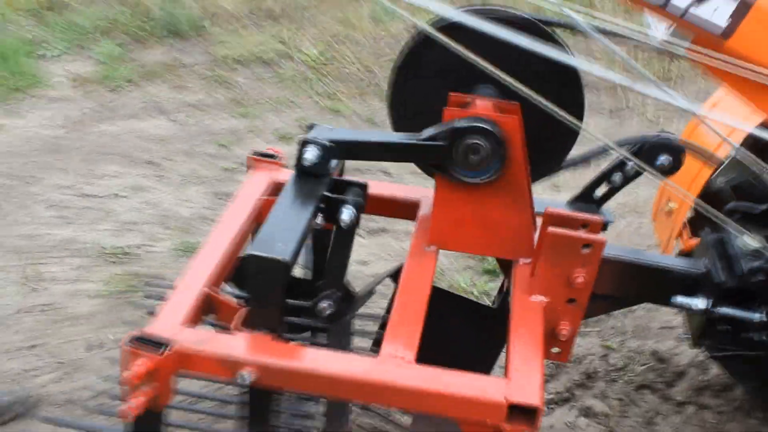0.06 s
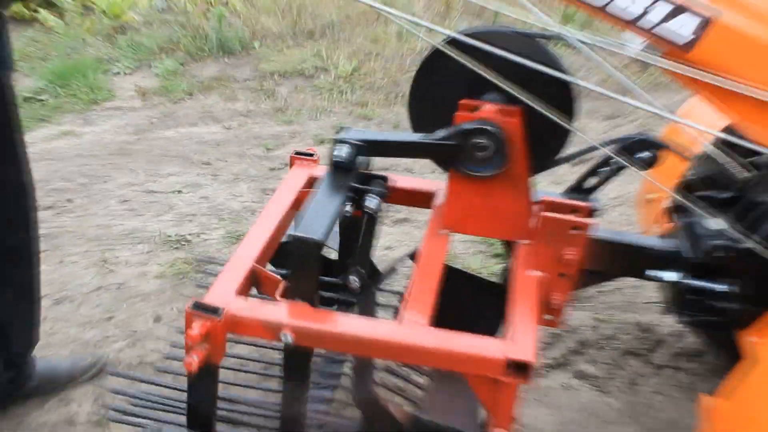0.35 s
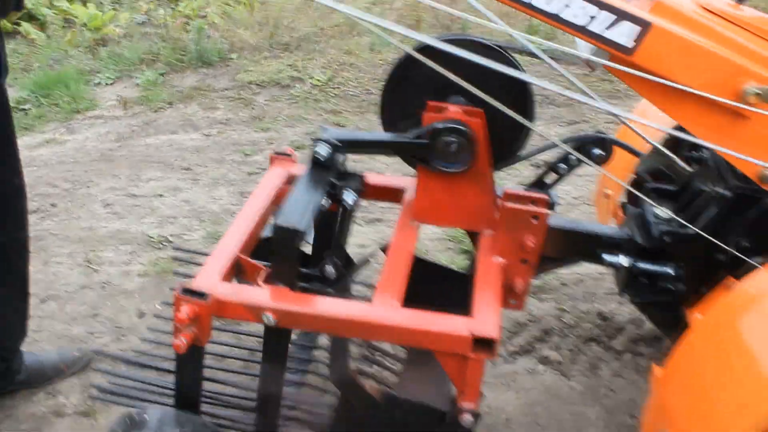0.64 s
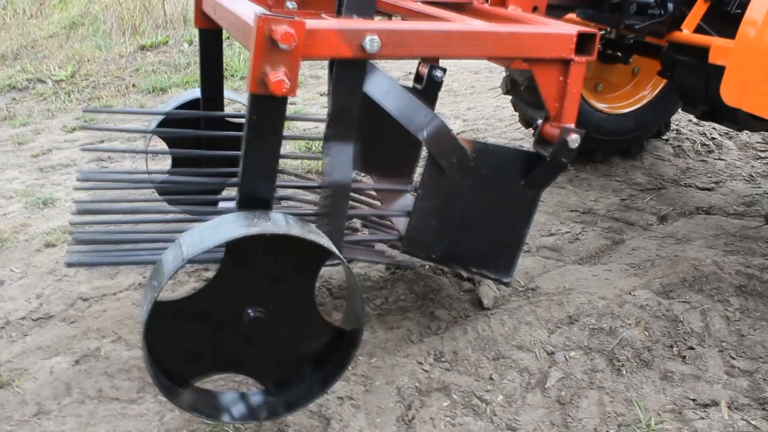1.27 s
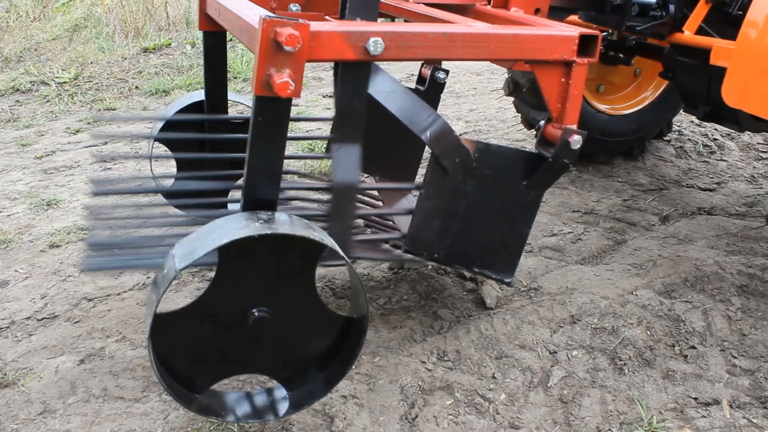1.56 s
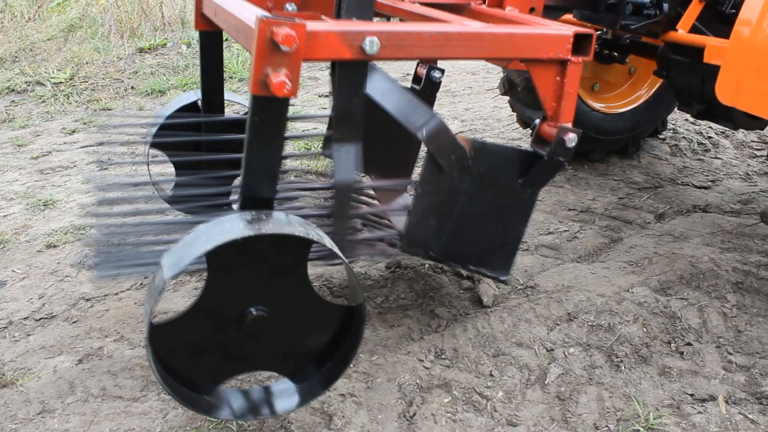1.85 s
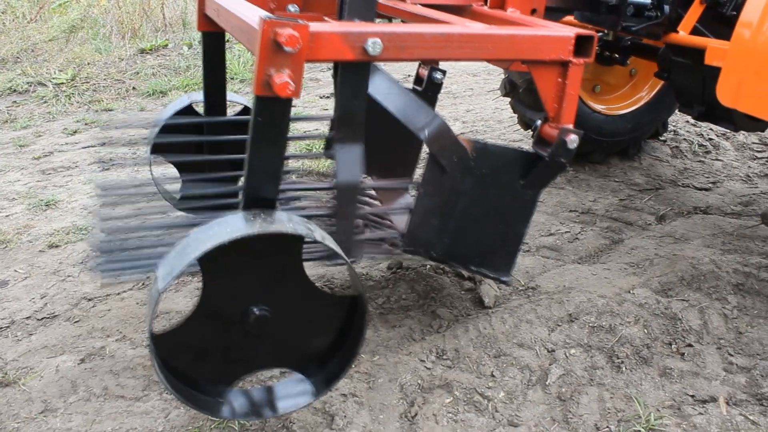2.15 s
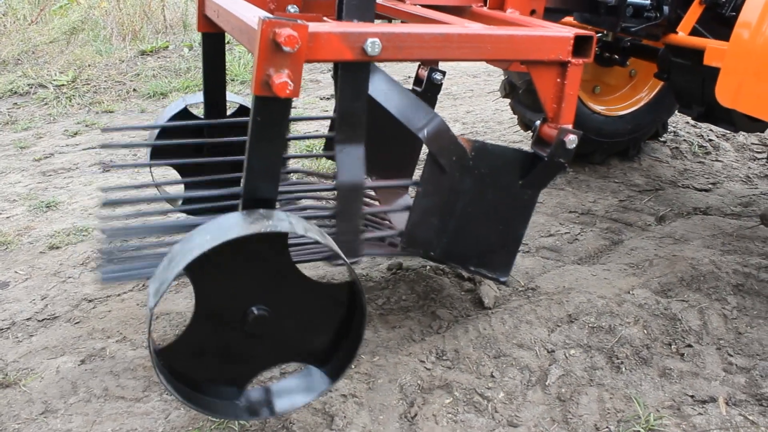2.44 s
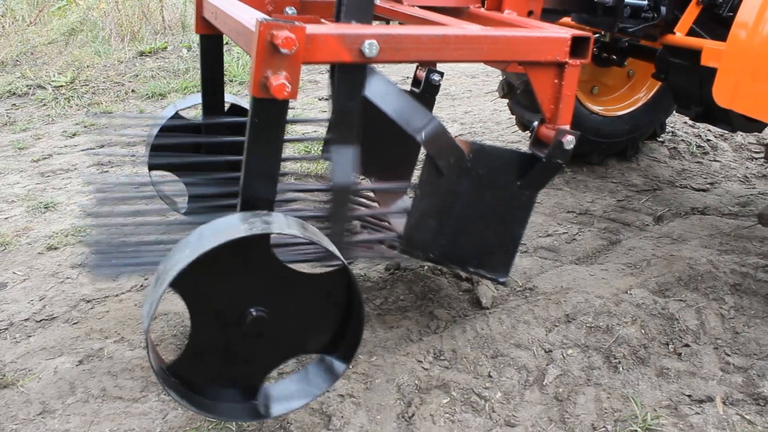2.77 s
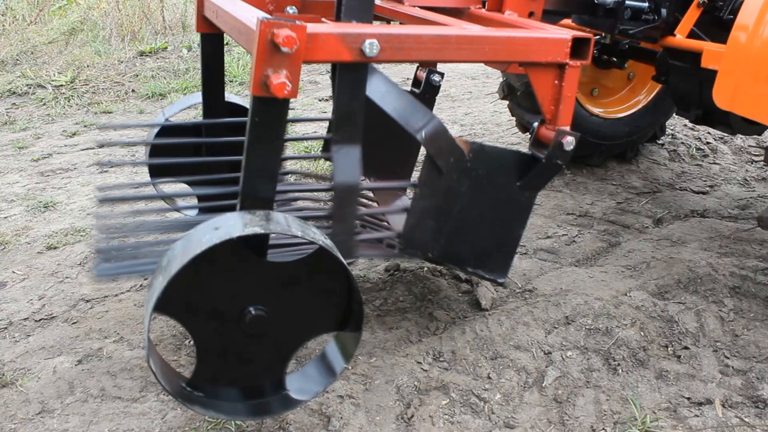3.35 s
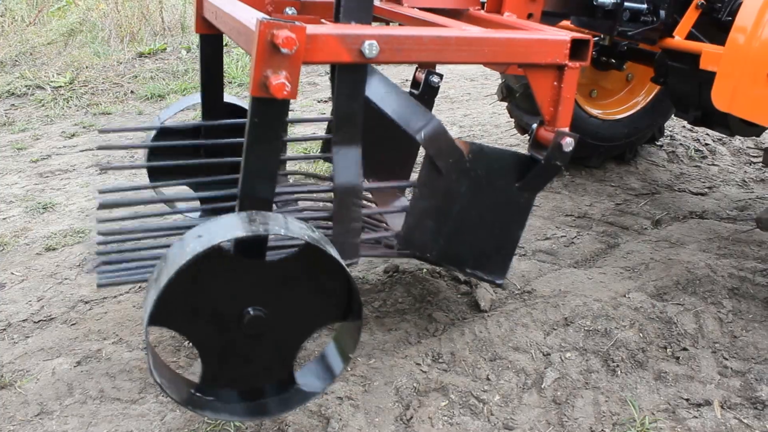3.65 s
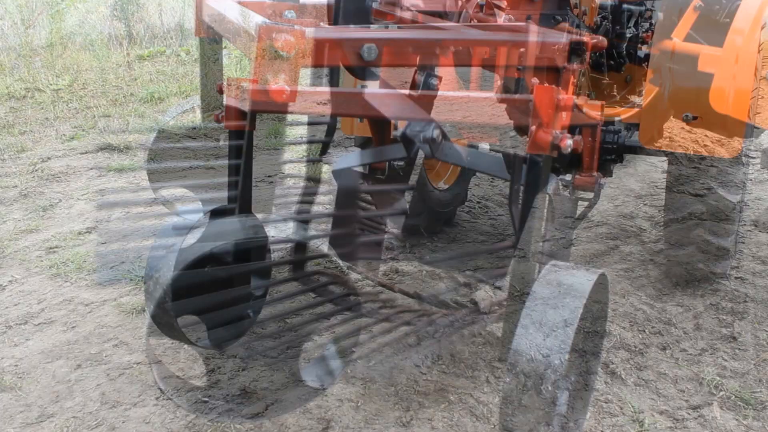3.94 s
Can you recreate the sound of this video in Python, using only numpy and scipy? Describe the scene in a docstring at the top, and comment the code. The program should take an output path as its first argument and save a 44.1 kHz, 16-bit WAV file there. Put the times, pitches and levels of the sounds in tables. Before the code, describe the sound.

A shaking potato digger clatters and pings continuously while the single-cylinder diesel pulling it thumps and knocks. Heard close on open soil with faint wind bumps, the rattle soon turns darker, with a bright jangle on each shake.

```python
"""A single-cylinder diesel walking tractor pulls a potato digger over dry soil, close by.
We start above the frame: each engine cycle gulps, thumps, pops and clatters, the steel sieve shakes
about 6.5 times a second in bursts of rattling, and light wind nudges the microphone.
About a second in we cut to beside the sieve. From there to the end the rattle has a darker top,
and the bright jangle of loose steel at each reversal of the sieve stands out more."""
import sys
import numpy as np
from scipy import signal
from scipy.fft import rfft, irfft, next_fast_len
from scipy.io import wavfile
from scipy.ndimage import uniform_filter1d

SR = 44100
rng = np.random.default_rng(int(sys.argv[2]) if len(sys.argv) > 2 else 0)


def generate_wav(sig):
    """Save sig (samples, or channels by samples) to the path in sys.argv[1] as 16-bit PCM at SR."""
    pcm = np.round(np.clip(np.atleast_2d(sig).T, -1, 1) * 32767).astype(np.int16)
    wavfile.write(sys.argv[1], SR, pcm)


N = 176400
CUT_S, CROSSFADE_S = 0.98, .02  # from above the frame to beside the sieve
CYCLE_S = .10829  # one engine cycle
POP_ABOVE_S, POP_BESIDE_S = .0885, 1.1255  # one pop anchors the engine's beat at each position

# Wind bumps on the microphone: centre_s, level_db, half_width_s
WIND_BUMPS = [(.31, -43, .025), (.43, -52, .025), (.52, -44, 0.018), (.76, -34, .02), (1.86, -50, .014),
              (2.52, -60, .018), (2.85, -47, .02), (3.5, -43, 0.024)]
# Low rumble of the wind: frequency_hz, gain_db
WIND_EQ = [(12, -25), (26, -5), (42, 0), (60, -2), (90, -14), (200, -40), (500, -80)]

# Steady bed of engine and soil noise: frequency_hz, gain_db
BED_EQ = [(25, -58), (55, -37), (85, -11.5), (125, -1), (205, 0.5), (270, -10), (420, -0.5), (750, -9.5),
          (1100, -5.5), (2300, -1), (3200, -13), (6300, -32.5), (9000, -27), (11500, -40)]
# One cycle's gas pulses, above the frame: start_from_pop_s, length_s, start_hz, end_hz, relative_db
PULSES_ABOVE = [(-.0595, .010, 1550, 1000, -16), (-.042, .028, 115, 92, -27), (-.039, .014, 330, 200, -25),
                (-.0072, .014, 400, 280, -16.5), (.021, .014, 320, 190, -25)]
# The same, beside the sieve: start_from_pop_s, length_s, start_hz, end_hz, relative_db
PULSES_BESIDE = [(-.0555, .016, 1600, 1130, -17.5), (-.039, .032, 120, 98, -26),
                 (-.038, .009, 1150, 1050, -20), (-.036, .016, 290, 210, -29), (-.003, .010, 540, 280, -18),
                 (.020, .042, 206, 202, -27)]
# One cycle's piston and valve knocks: start_from_pop_s, relative_db, decay_s
ENGINE_KNOCKS = [(-.053, -27, .008), (-.035, -23, .016), (.012, -28, .01), (.024, -26, .009)]
# Metallic tone of the knocks: frequency_hz, gain_db
KNOCK_EQ = [(50, -39), (120, -26), (300, -26.5), (600, -3), (1100, -3.5), (2200, -5.5), (3000, -5),
            (4500, -22.5), (7000, -22), (11000, -43)]
# How hard the engine fires: time_s, gain_db
ENGINE_LOAD = [(0.06, 1), (0.39, 2), (0.71, -0.5), (0.99, -1), (1.2, 3), (1.42, -0.5), (1.64, 2.5),
               (1.87, -7), (2.08, 6), (2.29, -6.5), (2.41, 5), (2.51, -5), (2.618, 1.5), (2.94, 1),
               (3.05, -0.5), (3.26, -1), (3.8, 4.5), (3.92, -0.5)]

# Clashes as the sieve reverses, one a shake: peak_s, level_db
REVERSALS = [(.08, -40), (.23, -34), (.38, -27), (.533, -27), (.69, -41), (.835, -31), (1.048, -26),
             (1.205, -32), (1.355, -28), (1.507, -25.5), (1.655, -24), (1.815, -30.5), (1.962, -29),
             (2.113, -23.5), (2.27, -27), (2.416, -22), (2.567, -27.5), (2.72, -24), (2.875, -23.5),
             (3.025, -26.5), (3.175, -25), (3.325, -26), (3.475, -30), (3.629, -21), (3.785, -23.5),
             (3.94, -24.5)]
# Bright sheen of the clashes: frequency_hz, gain_db
CLASH_EQ = [(2000, -47), (4200, 11), (5500, -2.5), (6800, 1.5), (7800, 1.5), (9000, -1.5), (10400, 2),
            (11900, -4)]
# Rattle bursts from the sieve and its linkage: peak_s, relative_db, rise_s, fall_s
RATTLE_BURSTS = [(0.019, -20.5, 0.096, 0.091), (0.079, -16, 0.019, 0.064), (0.117, -17, 0.0097, 0.042),
                 (0.229, -19, 0.014, 0.041), (0.274, -15.5, 0.037, 0.043), (0.379, -14, 0.018, 0.041),
                 (0.454, -39, 0.047, 0.1), (0.535, -17, 0.016, 0.098), (0.609, -15.5, 0.088, 0.015),
                 (0.704, -18.5, 0.022, 0.12), (0.778, -26.5, 0.055, 0.043), (0.835, -15, 0.012, 0.041),
                 (0.875, -14.5, 0.016, 0.047), (0.942, -18.5, 0.047, 0.084), (1.05, -19, 0.011, 0.045),
                 (1.079, -18.5, 0.01, 0.066), (1.2, -12, 0.012, 0.042), (1.25, -17.4, 0.01, 0.039),
                 (1.367, -16, 0.043, 0.073), (1.436, -18.5, 0.028, 0.021), (1.529, -15.5, 0.029, 0.056),
                 (1.661, -22.5, 0.035, 0.05), (1.689, -12, 0.03, 0.034), (1.859, -16.5, 0.049, 0.034),
                 (1.962, -20, 0.031, 0.078), (2.011, -21, 0.018, 0.027), (2.127, -15.5, 0.057, 0.027),
                 (2.19, -14, 0.043, 0.018), (2.296, -17.4, 0.036, 0.048), (2.399, -21, 0.0071, 0.12),
                 (2.451, -13.5, 0.05, 0.025), (2.613, -14.0, 0.045, 0.022), (2.724, -16.5, 0.025, 0.033),
                 (2.762, -21, 0.033, 0.062), (2.885, -15.5, 0.041, 0.038), (2.915, -15.5, 0.019, 0.05),
                 (3.024, -16.5, 0.013, 0.076), (3.061, -19, 0.024, 0.031), (3.208, -14.7, 0.036, 0.023),
                 (3.242, -16, 0.021, 0.036), (3.327, -20.0, 0.006, 0.039), (3.364, -15.5, 0.021, 0.043),
                 (3.477, -15.8, 0.015, 0.061), (3.516, -20.5, 0.023, 0.026), (3.638, -16, 0.051, 0.033),
                 (3.692, -17, 0.041, 0.046), (3.809, -11.5, 0.038, 0.029), (3.859, -19.9, 0.019, 0.066),
                 (3.936, -14.5, 0.014, 0.022), (3.961, -14, 0.011, 0.051)]
# Tone of the rattle above the frame: frequency_hz, gain_db
RATTLE_EQ_ABOVE = [(50, -49), (150, -20.5), (330, 0), (650, -5), (1100, -2.5), (1800, -1), (2400, 2.5),
                   (3100, 1), (4000, 0), (5300, -1), (6700, -4), (7800, -12), (10500, -20), (11800, -54)]
# Tone of the rattle beside the sieve: frequency_hz, gain_db
RATTLE_EQ_BESIDE = [(50, -36), (150, -8), (400, -9), (700, -11.5), (1150, 0.5), (1500, -2.5), (2000, -0.5),
                    (2350, -2.5), (2850, 0.5), (3300, -1), (3800, -1.5), (5000, -7), (6500, -10),
                    (7600, -21.5), (10500, -20), (12000, -32.5)]
# Ringing modes of the steel frame: pitch_hz, relative_db, t60_s
FRAME_MODES = [(1066, -1, .25), (1584, -3, .25), (2039, -3, .25), (2121, -2, .3), (2790, -4, .2),
               (2835, 1, .25), (3130, -1, .2), (4316, -11, .15)]
# Body of the frame's thud: frequency_hz, gain_db
THUD_EQ = [(50, -67), (110, -2), (170, 4), (320, -0.5), (480, -1.5), (650, -5.5), (900, 7), (1500, -18.5),
           (4000, -49)]
# Pings of loose tines and pins: centre_hz, log_pitch_spread, relative_db, t60_s
TINE_PINGS = [(1200, .1, -10, .05), (1750, .15, -13, .04), (3080, .09, -6, .055), (4500, .16, -15, .035)]


def amp(db):
    """Decibels to gain."""
    return 10 ** (np.asarray(db) / 20)


def unit(x):
    """Scale to rms 1."""
    return x / np.sqrt(np.mean(x ** 2) + 1e-20)


def clock():
    """Each sample's time in seconds."""
    return np.arange(N) / SR


def equalise(x, curve, size=4096):
    """Shape x with a minimum-phase EQ of unit energy."""
    hz, db = np.transpose(curve)
    shape_db = np.interp(np.log(np.fft.rfftfreq(size, 1 / SR) + 1), np.log(hz), db)
    cepstrum = irfft(np.log(amp(shape_db)))
    cepstrum[1:size // 2] *= 2  # fold forward, so nothing rings ahead of a hit
    cepstrum[size // 2 + 1:] = 0
    response = irfft(np.exp(rfft(cepstrum)))
    return signal.fftconvolve(x, response / np.linalg.norm(response))[:N]


def noise(curve):
    """Equalised noise of rms 1."""
    return unit(equalise(rng.standard_normal(N), curve))


def contacts(per_s, spread_db):
    """A crackle of tiny uneven impacts, levelled to rms 1 over about 20 ms."""
    hits = (rng.random(N) < per_s / SR) * np.sign(rng.standard_normal(N))
    hits *= amp(spread_db * np.clip(rng.standard_normal(N), -2, 2))
    local_power = np.abs(uniform_filter1d(hits ** 2, size=900))
    return hits / np.sqrt(local_power + 1e-9)


def chatter(hits, t60_s=0.036, buzz_db=0.5):
    """Each contact rattles on for a moment in a fast-dying buzz."""
    decay = amp(-60 / (t60_s * SR)) ** 2
    tail_power = signal.lfilter([1 - decay], [1, -decay], hits ** 2)
    buzz = np.sqrt(tail_power) * rng.standard_normal(N)
    return unit(hits + amp(buzz_db) * buzz)


def perspective():
    """The crossfader: 0 above the frame, 1 beside the sieve."""
    return np.clip((clock() - CUT_S) / CROSSFADE_S + .5, 0, 1)


def wind():
    """Soft low bumps of air on the microphone."""
    t = clock()
    swells = sum(amp(db) * np.exp(-((t - at) / width) ** 2 / 2) for at, db, width in WIND_BUMPS)
    return swells * noise(WIND_EQ)


def gas_pulses(pop_s, pulses, scatter_db=1.57, pitch_scatter=0.045):
    """Intake and exhaust: short falling tones, a little different each cycle."""
    track = np.zeros(N + 2 * SR)  # a second of handle at each end
    for pop in np.arange(pop_s % CYCLE_S - CYCLE_S, N / SR + CYCLE_S, CYCLE_S):
        for offset_s, length_s, start_hz, end_hz, db in pulses:
            louder, higher = rng.standard_normal(2)
            progress = np.linspace(0, 1, int(length_s * SR))
            hz = (start_hz + (end_hz - start_hz) * progress) * (1 + pitch_scatter * higher)
            swell = np.sin(np.pi * progress ** 0.83) ** 2  # attack quicker than release
            tone = np.sin(2 * np.pi * np.cumsum(hz) / SR)
            start = round((pop + offset_s + 1) * SR)
            track[start:start + len(tone)] += amp(db + scatter_db * louder) * swell * tone
    return track[SR:SR + N]


def knock_envelope(pop_s):
    """Piston and valve gear hit sharply and die away, cycle after cycle."""
    from_pop = clock() - pop_s
    power = sum((amp(db) * np.exp(-((from_pop - start_s) % CYCLE_S) / decay_s)) ** 2
                for start_s, db, decay_s in ENGINE_KNOCKS)
    return np.sqrt(power)


def engine(gas_db=-2, knock_db=0.5, bed_db=-29, low_cut_hz=60):
    """The diesel's chug: gas pulses and metallic knocks ride the load over a steady noise bed."""
    beside = perspective()
    gas = (1 - beside) * gas_pulses(POP_ABOVE_S, PULSES_ABOVE)
    gas += beside * gas_pulses(POP_BESIDE_S, PULSES_BESIDE)
    gas = signal.sosfilt(signal.butter(2, low_cut_hz, "high", fs=SR, output="sos"), gas)
    force = (1 - beside) * knock_envelope(POP_ABOVE_S) + beside * knock_envelope(POP_BESIDE_S)
    knocks = equalise(force * contacts(per_s=4000, spread_db=3.5), KNOCK_EQ)
    load = amp(np.interp(clock(), *np.transpose(ENGINE_LOAD)))
    return load * (amp(gas_db) * gas + amp(knock_db) * knocks) + amp(bed_db) * noise(BED_EQ)


def burst(peak_s, db, rise_s, fall_s):
    """An envelope with exponential attack and release."""
    t = clock()
    return amp(db) * np.exp(-np.maximum((peak_s - t) / rise_s, (t - peak_s) / fall_s))


def clashes():
    """Loose steel jangles brightly at each reversal of the sieve."""
    envelope = sum(burst(peak_s, db, rise_s=0.013, fall_s=0.021) for peak_s, db in REVERSALS)
    jangle = chatter(contacts(per_s=600, spread_db=3))
    return envelope * unit(equalise(jangle, CLASH_EQ))


def frame_ring(force):
    """The contacts set the steel frame ringing in its modes."""
    age = np.arange(SR // 2) / SR
    modes = sum(amp(db - 60 * age / t60_s) / np.sqrt(t60_s) * np.sin(2 * np.pi * hz * age)
                for hz, db, t60_s in FRAME_MODES)
    return signal.fftconvolve(force, modes / np.linalg.norm(modes))[:N]


def tine_pings(shake, centre_hz, pitch_spread, db, t60_s, count=1000, spread_db=3.5):
    """Loose tines and pins ping at scattered pitches, louder when the shake is harder."""
    starts = (rng.random(count) * N).astype(int)
    higher, louder = np.clip(rng.standard_normal((2, count, 1)), -2, 2)
    age = np.arange(SR // 20) / SR
    hz = centre_hz * np.exp(pitch_spread * higher)
    rings = amp(spread_db * louder - 60 * age / t60_s) * np.sin(2 * np.pi * hz * age)
    attack = 1 - np.exp(-age * centre_hz / 2)
    rings *= attack * rng.choice([-1, 1], (count, 1))
    rings *= np.sqrt(N / np.sum(rings ** 2))  # together about rms 1
    rings *= shake[starts, None]
    samples = starts[:, None] + np.arange(len(age))
    return amp(db) * np.bincount(samples.ravel(), rings.ravel(), N)[:N]


def sieve(rattle_db=-1, ring_db=-12.5, thud_db=-34.5, scrape_share=.3):
    """Each shake throws steel and soil into a burst of contacts that ping, thud and ring the frame."""
    beside = perspective()
    shake = np.sqrt(sum(burst(*row) ** 2 for row in RATTLE_BURSTS))
    hits = chatter(contacts(per_s=800, spread_db=3))
    scrape = rng.standard_normal(N)
    grit = np.sqrt(1 - scrape_share) * hits + np.sqrt(scrape_share) * scrape
    force = amp(rattle_db) * shake * grit
    rattle = equalise(force * (1 - beside), RATTLE_EQ_ABOVE)
    rattle += equalise(force * beside, RATTLE_EQ_BESIDE)
    ring = amp(ring_db) * frame_ring(force)
    thud = amp(thud_db) * unit(shake ** 1.27) * noise(THUD_EQ)  # favours the hardest shakes
    pings = sum(tine_pings(shake, *row) for row in TINE_PINGS)
    return rattle + ring + thud + pings


def scene():
    """All layers meet at one microphone, the same in both ears."""
    return np.tile(engine() + sieve() + clashes() + wind(), (2, 1))


def record(dry):
    """A soft limiter rounds the highest peaks, then a brick-wall filter trims the top."""
    ceiling, top_hz = .95, 12100
    limited = dry / (1 + (dry / ceiling) ** 8) ** (1 / 8)
    size = next_fast_len(N + SR // 2)
    passband = np.fft.rfftfreq(size, 1 / SR) < top_hz
    return irfft(rfft(limited, size) * passband, size)[:, :N]


dry = scene()
out = record(dry)
generate_wav(out)
```